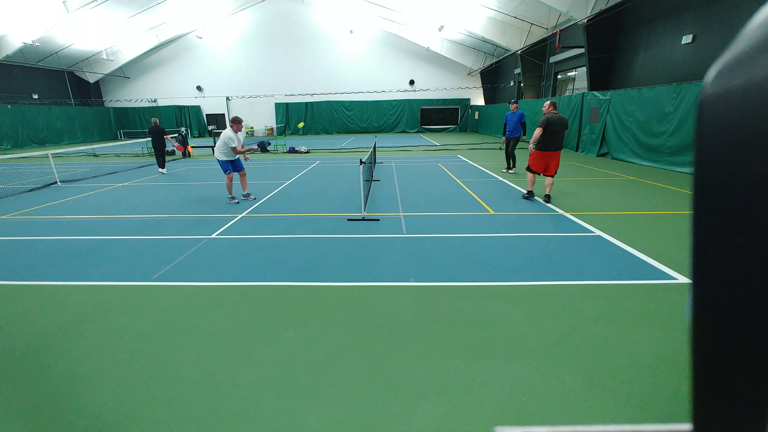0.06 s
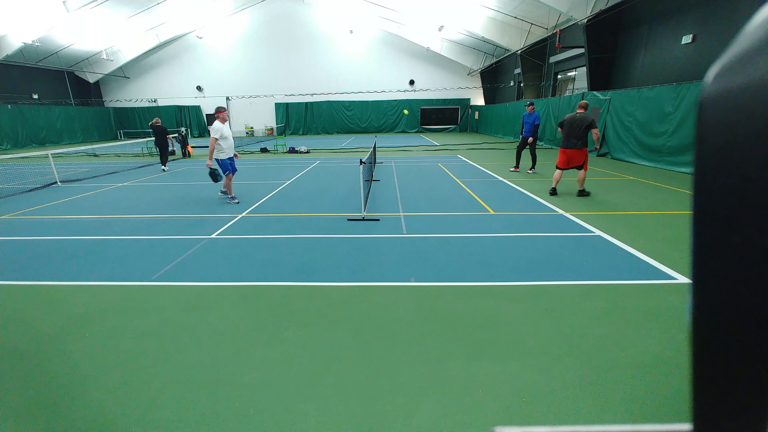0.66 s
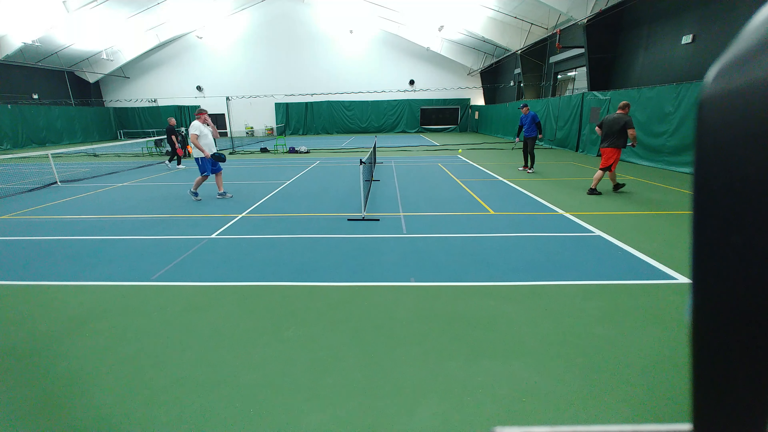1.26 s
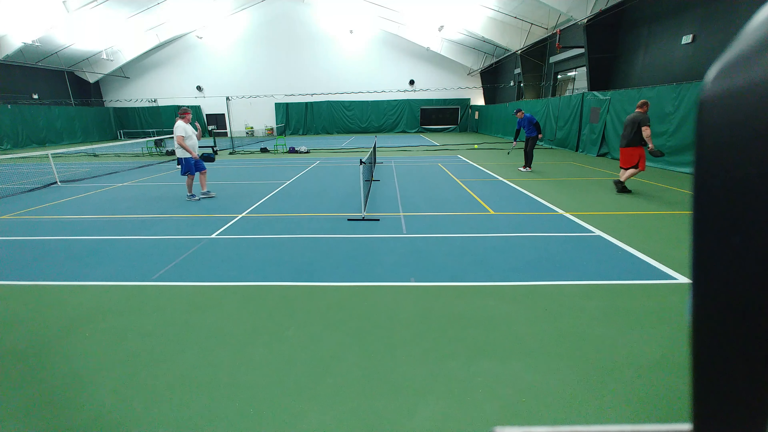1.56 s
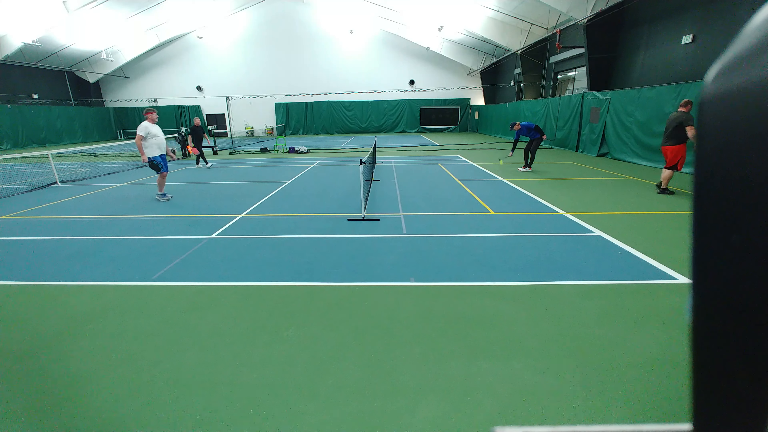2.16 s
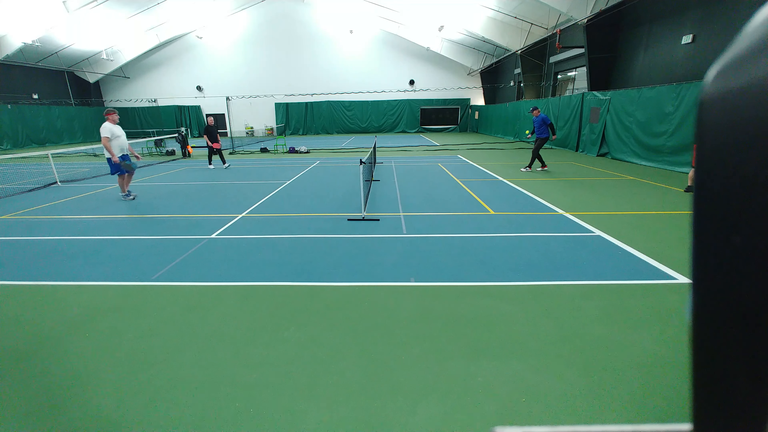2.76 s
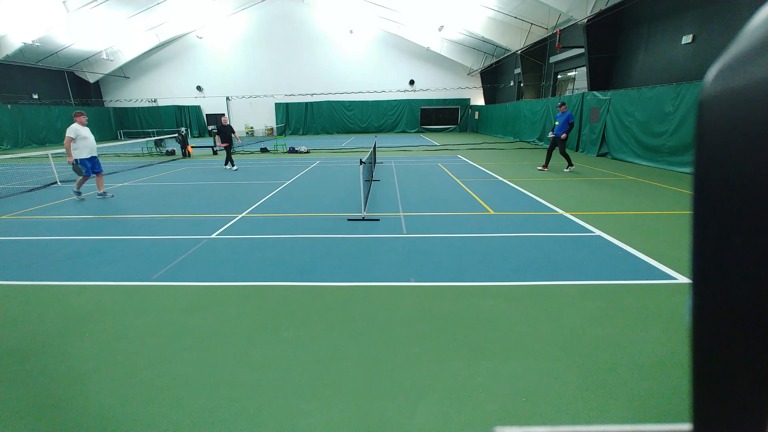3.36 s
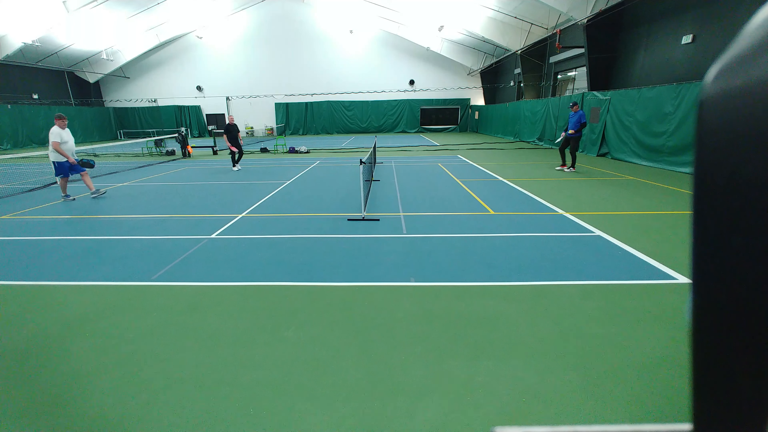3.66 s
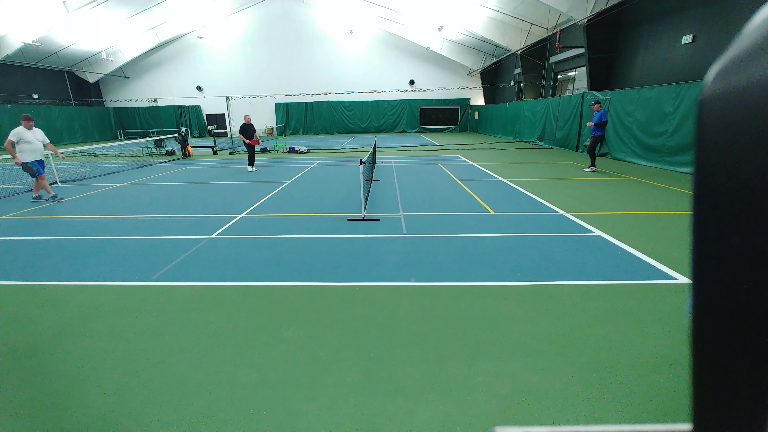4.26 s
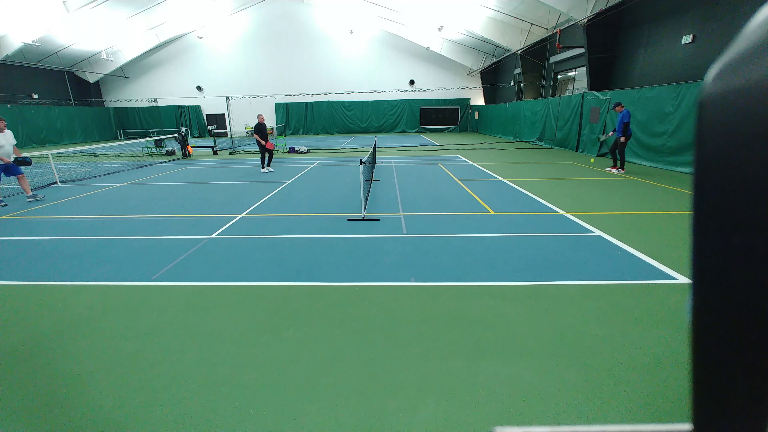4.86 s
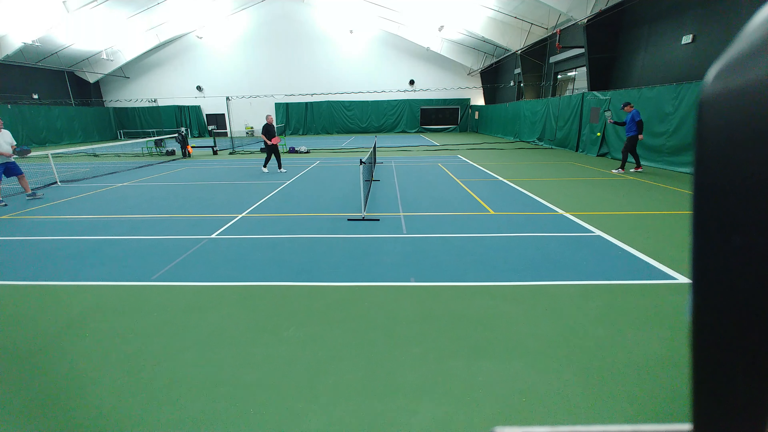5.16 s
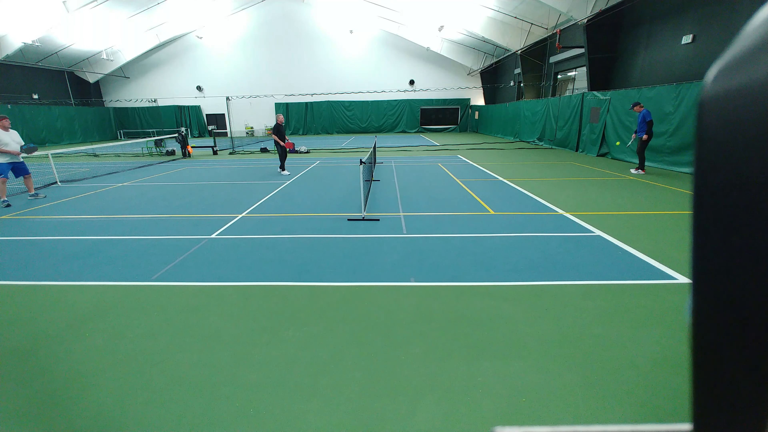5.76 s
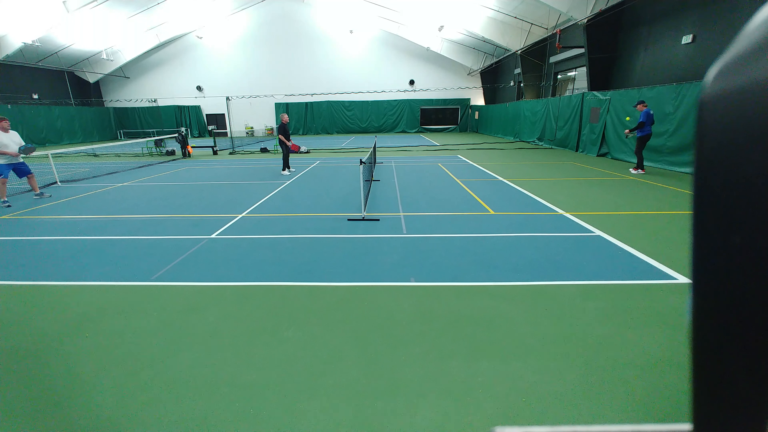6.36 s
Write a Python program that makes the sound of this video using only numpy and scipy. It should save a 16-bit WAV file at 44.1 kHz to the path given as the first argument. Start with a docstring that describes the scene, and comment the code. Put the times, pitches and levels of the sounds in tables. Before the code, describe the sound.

Sharp, irregular pops of pickleball paddles and the clack of a hollow ball bouncing ring through a big indoor hall, heard from courtside. A couple of bounces come first, then a short run of hits, a lull with faint shoe scuffs and squeaks, and a last few bounces and hits. A low ventilation rumble lies underneath and gets quieter about halfway through.

```python
"""Pickleball paddles ping in a large indoor tennis hall, heard from the side of the court.
Each stroke rings the honeycomb face and bends the paddle with a thud; the hollow plastic ball clacks
on the floor. The pitched roof throws each pop back, often louder than it came directly, then the far
walls answer with a long wash. Rubber soles scuff and the ventilation rumbles underneath.
Noise suppression turns the quiet stretches down."""
import sys
import numpy as np
from scipy import signal
from scipy.fft import rfft, irfft, next_fast_len
from scipy.io import wavfile
from scipy.ndimage import uniform_filter1d, map_coordinates

SR = 44100
rng = np.random.default_rng(int(sys.argv[2]) if len(sys.argv) > 2 else 0)


def log_audio(samples):
    """Write samples as a 16-bit WAV file to the path given in sys.argv[1]."""
    # one column per channel
    frames = np.atleast_2d(samples).T
    # limit to full scale, then quantise
    limited = np.clip(frames, -1, 1)
    pcm = np.round(limited * 32767).astype(np.int16)
    wavfile.write(sys.argv[1], SR, pcm)


N = 291931
POP_T = np.arange(SR // 10) / SR  # time axis of one pop, in seconds


def amp(db):
    """Decibels to gain."""
    return 10 ** (np.asarray(db) / 20)


def unit(x):
    """Scale to rms 1."""
    return x / np.sqrt(np.mean(x ** 2) + 1e-20)


def along(points, hz):
    """Read a curve of (freq_hz, value) points on a log frequency axis."""
    freqs, values = np.transpose(points)
    return np.interp(np.log(hz + 1), np.log(freqs + 1), values)


def filtered(x, response):
    """Equalise x with a gain that is a function of frequency."""
    n = x.shape[-1]
    padded = next_fast_len(n + SR // 10)
    return irfft(rfft(x, padded) * response(np.fft.rfftfreq(padded, 1 / SR)), padded)[..., :n]


def add(out, start_s, sound, pan_db=0):
    """Mix a sound in at start_s; pan_db is left level minus right."""
    start = round(start_s * SR)
    panned = sound * amp([[pan_db / 2], [-pan_db / 2]])
    piece = panned[:, max(-start, 0):N - start]
    out[:, max(start, 0):][:, :piece.shape[1]] += piece


def lumps(shape, frames):
    """A random field of rms 1 over frequency and time, gliding to new values every few frames."""
    rows, cols = np.indices(shape)
    knots = rng.standard_normal(shape)
    return unit(map_coordinates(knots, [rows, cols / frames], order=1))


# How alike left and right are in diffuse sound: freq_hz, correlation
STEREO_LIKENESS = [(30, 0.027), (120, 0.65), (400, 0.55), (1000, 0), (2500, 0), (12000, 0)]

def diffuse(spectrum, n):
    """Stereo noise of rms 1 from all sides: alike in the bass, unrelated in the treble."""
    def mid_side_gains(hz):
        angle = np.arccos(np.clip(along(STEREO_LIKENESS, hz), -1, 1)) / 2
        return amp(along(spectrum, hz)) * [np.cos(angle), np.sin(angle)]
    mid, side = filtered(rng.standard_normal((2, n)), mid_side_gains)
    return unit(np.array([mid + side, mid - side]))


# Tone of the moving air: freq_hz, density_db
AIR_SPECTRUM = [(20, -12.5), (45, -3), (90, -4.5), (150, -13.5), (250, -22.5), (500, -25.5), (1000, -31),
                (2400, -26.5), (4500, -36), (6500, -48), (9000, -48.5), (12000, -56.5)]
# Fader ride on the rumble and drone: time_s, gain_db
RUMBLE_RIDE = [(0.1, -50.5), (0.78, -51), (3.43, -52.5), (3.45, -57), (6.5, -57.5)]

def ventilation():
    """Air handlers: a rumble and fan drone that drop in level midway, under a faint steady hiss."""
    air = diffuse(AIR_SPECTRUM, N)
    rumble = filtered(air, lambda hz: 1 / (1 + (hz / 220) ** 4))
    hiss = air - rumble
    drone = unit(filtered(rng.standard_normal(N), lambda hz: 1 / (1 + ((hz - 73) / 3) ** 2)))
    ride = amp(np.interp(np.arange(N) / SR, *np.transpose(RUMBLE_RIDE)))
    return ride * (amp(2.5) * unit(rumble) + amp(-10) * drone) + amp(-53) * hiss


# Tone of the reverb: freq_hz, density_db
HALL_SPECTRUM = [(60, -4.5), (250, -10.5), (600, -4), (1000, -3.5), (1300, 1.5), (2500, 3), (4500, 1.5),
                 (7500, -4), (11500, -8)]
# Decay of the wash, longest in the upper mids: freq_hz, t60_s
HALL_DECAY = [(100, 0.96), (400, 1.4), (1300, 1.654), (2600, 2.38), (5000, 1.6), (8000, 0.76),
              (12000, 0.61)]

def hall_tail(colour, near_db=0, far_db=0, near_t60_s=0.319, far_wall_s=0.2554, onset_s=0.046):
    """Nearby scatter dies fast; the wash holds until the far walls have answered, then decays."""
    noise = filtered(diffuse(HALL_SPECTRUM, 2 * SR), colour)
    hz, t, bands = signal.stft(noise, SR, nperseg=256)
    rise = np.minimum(t / far_wall_s, 1)
    swell_db = 3 * (rise - 1)
    air_loss_db = 7 * rise * hz[:, None] / 10000  # long paths lose treble
    decay_db = 60 * np.maximum(t - far_wall_s, 0) / along(HALL_DECAY, hz)[:, None]
    wash = amp(far_db - 3.5 + swell_db - air_loss_db - decay_db)
    near = amp(near_db + 5.5 - 60 * t / near_t60_s)
    # echoes bunch in time and interfere in frequency
    clumps_db = 1.2 * lumps((1, len(t)), 4) + 1.8 * lumps(wash.shape, 7) + 1.1 * lumps((len(hz), 1), 1)
    envelope = np.hypot(wash, near) * (1 - np.exp(-t / onset_s)) * amp(clumps_db)
    return signal.istft(bands * envelope, SR, nperseg=256)[1] / np.sqrt(SR / 4)


# Tone of the plastic snap, also the raw noise of the scuffs: freq_hz, density_db
CRACK_SPECTRUM = [(100, 11), (500, 6.5), (1500, 2), (3000, 0), (5000, -3.5), (6300, -8.5), (7600, -6),
                  (10500, -16), (13000, -38.5)]

def crack(t60_s, rise_s):
    """The brief broadband snap of hard plastic."""
    noise = diffuse(CRACK_SPECTRUM, len(POP_T))
    return noise * amp(-60 * POP_T / t60_s) * (1 - np.exp(-POP_T / rise_s))


def pop_reverb(tones, crack_db, near_db, far_db, low_cut_hz):
    """The hall gathers a pop from all directions, so its tones and its crack add in power."""
    tone_power = np.sum(np.abs(rfft(np.array(tones)[:, 0])) ** 2, axis=0)
    tone_hz = np.fft.rfftfreq(len(POP_T), 1 / SR)
    def colour(hz):
        low_cut = hz ** 2 / np.hypot(hz ** 2, low_cut_hz ** 2)
        crack_power = amp(crack_db + along(CRACK_SPECTRUM, hz)) ** 2
        return low_cut * np.sqrt(np.interp(hz, tone_hz, tone_power) + crack_power)
    return hall_tail(colour, near_db, far_db)


# Scuffs and squeaks, near and far: start_s, length_s, level_db, centre_hz, half_width_octaves
SHOE_SCUFFS = [(0.326, 0.045, -49, 5650, 1.1), (0.418, 0.11, -47.5, 4400, 0.576),
               (0.757, 0.11, -47, 3030, 3.2), (2.15, 0.03, -46.5, 3960, 0.39),
               (2.214, 0.019, -43, 3000, 1.2), (2.475, 0.31, -44.5, 4270, 0.74),
               (2.978, 0.38, -46, 1880, 0.15), (3.172, 0.029, -47.5, 4740, 0.52),
               (3.699, 0.5, -61, 4750, 0.46), (3.988, 0.035, -50.5, 600, 2.1),
               (4.105, 0.034, -55, 2970, 1.7), (4.668, 0.031, -50.5, 4130, 0.257),
               (5.104, 0.23, -47.5, 2560, 0.53)]

def shoes():
    """Rubber soles rub the court in gritty bursts that swell and fade."""
    out = np.zeros((2, N))
    t = np.arange(SR) / SR
    for start_s, length_s, level_db, centre_hz, octaves in SHOE_SCUFFS:
        band = lambda hz: 1 / (1 + (np.log2((hz + 1) / centre_hz) / octaves) ** 2)
        grit = amp(2.1 * unit(uniform_filter1d(rng.standard_normal(SR), size=100)))
        rub = unit(grit * filtered(diffuse(CRACK_SPECTRUM, SR), band))
        slide = 3 * t / length_s  # the burst peaks a third of the way in
        add(out, start_s, amp(level_db) * rub * slide * np.exp(1 - slide))
    reverb = signal.fftconvolve(out, hall_tail(np.ones_like), axes=1)[:, :N]
    return out + amp(-7) * reverb


def ring(modes, pitch=1, contact_s=0.00079, scatter_db=0.52, spread_s=0.00015, alternate=False):
    """Damped modes, reaching left and right slightly apart; bending modes alternate in sign."""
    out = np.zeros((2, len(POP_T)))
    for k, (hz, level_db, t60_s) in enumerate(modes):
        t = np.maximum(POP_T - rng.uniform(0, 2 * spread_s, (2, 1)), 0)
        decay = amp(level_db + scatter_db * rng.normal() - 60 * t / t60_s)
        attack = 1 - np.exp(-t / contact_s)
        sign = (-1) ** k if alternate else 1
        out += sign * attack * decay * np.sin(2 * np.pi * hz * pitch * t)
    return out


def thinned(pop, low_cut_hz):
    """A small body radiates little bass."""
    return filtered(pop, lambda hz: (1j * hz / (low_cut_hz + 1j * hz)) ** 2)


def reflected(pop, dull_hz):
    """The roof's lining dulls a pop; the other echoes share that tone."""
    return filtered(pop, lambda hz: 1 / (1 + 1j * hz / dull_hz))


CURTAIN_DELAY_S, CURTAIN_PAN_DB = 0.0073, 4  # slap off the side curtain
# Roof and walls answer a bounce, timed from the roof echo: lag_s, level_db, shell_lift_db, pan_db
BOUNCE_ECHOES = [(0, -5, 0, -4), (.007, -13, -11, 2), (.058, -15, 3, -3.5), (0.109, -20, 9.5, -5.5)]

def bounce_paths(roof_s, roof_db, curtain_db):
    """Curtain slap, then the train led by the roof, each as delay_s, level_db, shell_lift_db, pan_db."""
    train = [(roof_s + lag_s, roof_db + level_db, lift_db, pan_db)
             for lag_s, level_db, lift_db, pan_db in BOUNCE_ECHOES]
    return [(CURTAIN_DELAY_S, curtain_db, 5.5, CURTAIN_PAN_DB)] + train


# Bright ring of the hollow shell: pitch_hz, level_db, t60_s
SHELL_MODES = [(2327, -2, 0.018), (2500, -0.5, 0.022), (3060, -2.5, 0.017), (3650, -5, 0.0095),
               (5710, -19.5, 0.015), (7500, -3, 0.011), (9196, -20, .005)]
# Knock of the ball flattening on the floor: pitch_hz, level_db, t60_s
KNOCK_MODES = [(1015, -2, 0.0048), (1230, -9.5, 0.0079)]
# Bounce cues: start_s, shell_db, knock_db, crack_db, low_cut_hz, near_wall_db, far_wall_db, pan_db,
# roof_delay_s, roof_db, curtain_db
BALL_BOUNCES = [(1.1357, -20, -12, -19, 660, 0, -2, -5, 0.0238, -3, -21),
                (1.9408, -26.5, -19, -22.5, 833, 2.5, -5.5, -5.5, 0.01897, -2.5, -26),
                (2.2926, -21, -11.5, -17, 300, -9, -4, -2.5, .017, -2.5, -22),
                (4.903, -26.5, -12.5, -25, 650, 3, -1, -13, .019, 0, -4.5),
                (5.6607, -21, -13.5, -24.5, 480, 11, 3, -13, 0.019, 1.5, -5.5)]

def ball():
    """Each bounce is a short knock, a snap and the ring of the hollow shell, answered by the hall."""
    out = np.zeros((2, N))
    for (start_s, shell_db, knock_db, crack_db, low_cut_hz, near_db, far_db, pan_db,
         roof_s, roof_db, curtain_db) in BALL_BOUNCES:
        shell = amp(shell_db) * ring(SHELL_MODES, contact_s=0.0006, scatter_db=-1.1, spread_s=0.000202)
        knock = amp(knock_db) * ring(KNOCK_MODES, contact_s=0.00026)
        snap = amp(crack_db + 1.5) * crack(t60_s=0.015, rise_s=0.0005)
        add(out, start_s, thinned(shell + knock + snap, low_cut_hz), pan_db)
        sends = [amp(-3) * shell, amp(-4.5) * knock]
        add(out, start_s, pop_reverb(sends, crack_db + 19.5, near_db, far_db, low_cut_hz))
        for delay_s, echo_db, lift_db, echo_pan_db in bounce_paths(roof_s, roof_db, curtain_db):
            scatter = amp(crack_db) * crack(t60_s=0.05, rise_s=0.0007)
            # the roof focuses the lowest shell modes
            focused = filtered(shell, lambda hz: 1 + (amp(lift_db) - 1) / (1 + (hz / 3000) ** 8))
            echo = thinned(focused + knock + scatter, low_cut_hz)
            add(out, start_s + delay_s, amp(echo_db) * reflected(echo, dull_hz=9500), echo_pan_db)
    return out


# The roof's three answers to a stroke: delay_s, level_db, ping_lift_db, pan_db
ROOF_ECHOES = [(0.0163, -1, 8.5, -1), (0.0213, -5, 15.5, -1.5), (0.032, -9.5, 13.5, 2)]
# Late slap off the end wall: delay_s, level_db, ping_lift_db, pan_db
END_WALL_ECHO = (0.07, -19, 18, 6.5)

def stroke_paths(roof_db, beam_db, flutter_db, curtain_db):
    """A stroke returns by the roof, a floor-to-roof flutter, the side curtain and the end wall."""
    roof = [(delay_s, roof_db + level_db, beam_db + lift_db, pan_db)
            for delay_s, level_db, lift_db, pan_db in ROOF_ECHOES]
    first_s, trip_s, trip_loss_db = 0.046, 0.0295, 1.5
    flutter = [(first_s + k * trip_s, flutter_db - k * trip_loss_db, beam_db - 1.5, 0) for k in range(5)]
    return roof + flutter + [(CURTAIN_DELAY_S, curtain_db, 0, -CURTAIN_PAN_DB), END_WALL_ECHO]


# Ping of the honeycomb face: pitch_hz, level_db, t60_s
FACE_MODES = [(1222.5, -18, 0.064), (1262, 0, 0.029), (2526, -12.5, 0.021), (3570, -23.5, 0.033),
              (5060, -20, 0.024)]
# Thud of the whole paddle bending: pitch_hz, level_db, t60_s
BENDING_MODES = [(173.3, -7.5, 0.018), (328.4, -3.5, 0.019), (412, -1, 0.013), (623, -8.5, 0.0231)]
# Edge ring of an off-centre stroke: pitch_hz, level_db, t60_s
EDGE_MODES = [(1777, -2, 0.016), (2424, -6.5, 0.012)]
# Stroke cues: start_s, ping_db, thud_db, crack_db, edge_db, face_pitch_ratio, low_cut_hz, near_wall_db,
# far_wall_db, pan_db, roof_db, upward_beam_db, flutter_db, curtain_db
PADDLE_STROKES = [(-.03, -22, -13.5, -22.5, -26.5, .98, 194.6, 9, 6, 5, -29, 9.5, -5.5, -30),
                  (2.2312, -21, -11.5, -21.5, -24, 1.014, 152, 4.5, 1, -3.5, -2, 6.5, -15, -23),
                  (2.7916, -25.5, -19, -32.5, -29, 1, 210, 5.5, .5, -8.5, 0.5, 0, -15.5, -17),
                  (3.2557, -18.5, -17.5, -25.5, -49, 1.005, 231, 6, -1, -5.5, 3.5, -1.5, -14, -10.5),
                  (5.5252, -26.5, -16.5, -19.5, -43, 1.02, 109, -1.5, -3.5, -4, -1, -3.5, -15.5, -2.5),
                  (6.0369, -30.5, -26, -39, -27.5, .98, 228, 9.5, 5.5, 2, 4, -4.5, -10, -12)]

def paddles():
    """Each stroke bends the paddle and rings its face, which beams its ping towards the roof."""
    out = np.zeros((2, N))
    for (start_s, ping_db, thud_db, crack_db, edge_db, pitch, low_cut_hz, near_db, far_db, pan_db,
         roof_db, beam_db, flutter_db, curtain_db) in PADDLE_STROKES:
        ping = amp(ping_db) * ring(FACE_MODES, pitch, contact_s=0.0017, spread_s=0.00018)
        thud = amp(thud_db) * ring(BENDING_MODES, contact_s=0.0012, spread_s=0.00029, alternate=True)
        edge = amp(edge_db) * ring(EDGE_MODES)
        snap = amp(crack_db) * crack(t60_s=0.029, rise_s=0.00041)
        add(out, start_s, thinned(ping + thud + edge + snap, low_cut_hz), pan_db)
        sends = [amp(7) * ping, amp(-1) * thud, amp(5.5) * edge]
        add(out, start_s, pop_reverb(sends, crack_db + 23, near_db, far_db, low_cut_hz))
        paths = stroke_paths(roof_db, beam_db, flutter_db, curtain_db)
        for delay_s, echo_db, lift_db, echo_pan_db in paths:
            # roof ribs spread the crack in time
            scatter = amp(crack_db - 0.5) * crack(t60_s=0.04, rise_s=0.0007)
            echo = thinned(amp(lift_db) * ping + thud + edge + scatter, low_cut_hz)
            add(out, start_s + delay_s, amp(echo_db) * reflected(echo, dull_hz=5090), echo_pan_db)
    return out


def scene():
    """Play on the court over the hall's air."""
    return paddles() + ball() + shoes() + ventilation()


def suppressor(x, threshold_db=-61, knee_db=3.5, range_db=5, smoothing_s=0.044):
    """Noise suppression turns everything down once the treble on the left has died away."""
    treble = filtered(x[0], lambda hz: 1 / (1 + (4000 / (hz + 1)) ** 4))
    step = 1 / (smoothing_s * SR)
    power = signal.lfilter([step], [1, step - 1], treble ** 2)
    level_db = 10 * np.log10(np.abs(power) + 1e-12)
    opening = np.tanh((level_db - threshold_db) / knee_db)
    return x * amp(range_db * (opening - 0.5) / 2)


def record(dry):
    """Noise suppression, then a steep cut of the highest treble."""
    top_hz = 12452
    return filtered(suppressor(dry), lambda hz: 1 / (1 + (hz / top_hz) ** 60))


dry = scene()
out = record(dry)
log_audio(out)
```